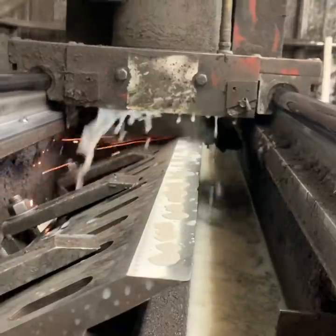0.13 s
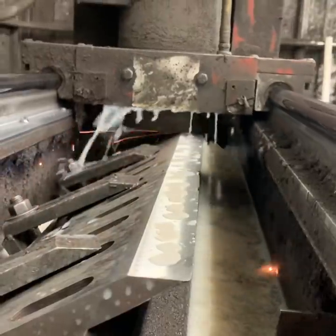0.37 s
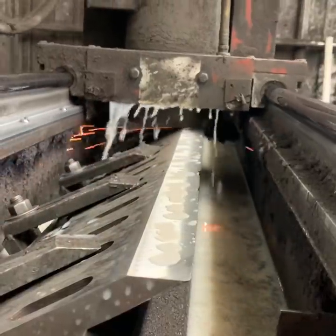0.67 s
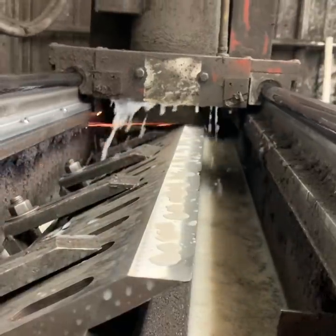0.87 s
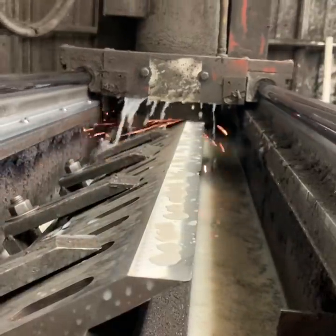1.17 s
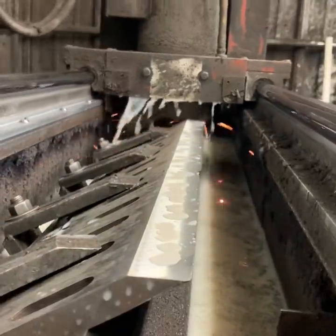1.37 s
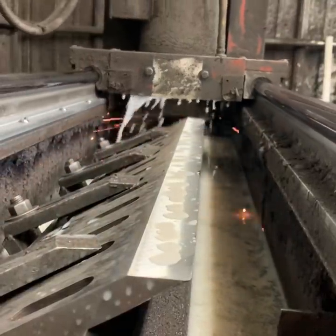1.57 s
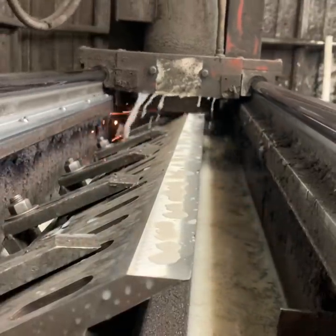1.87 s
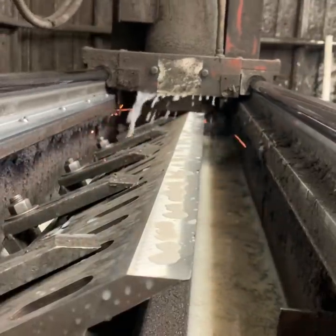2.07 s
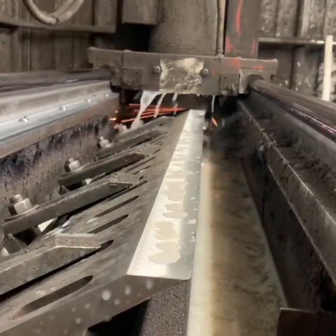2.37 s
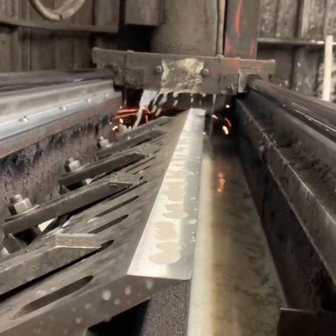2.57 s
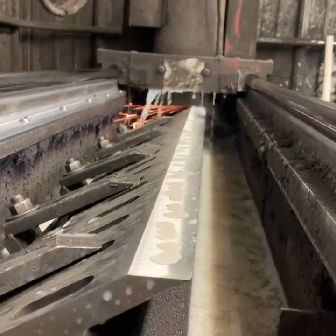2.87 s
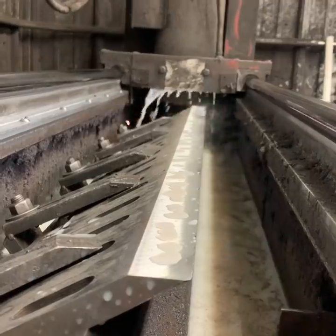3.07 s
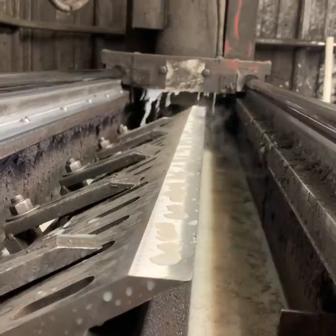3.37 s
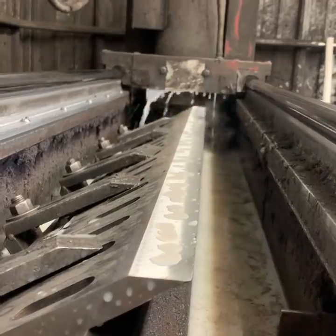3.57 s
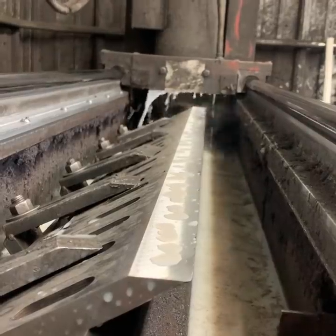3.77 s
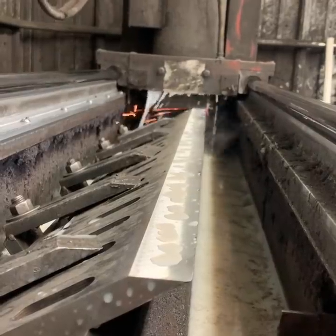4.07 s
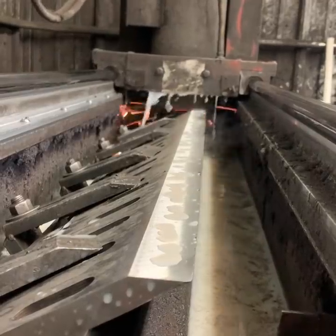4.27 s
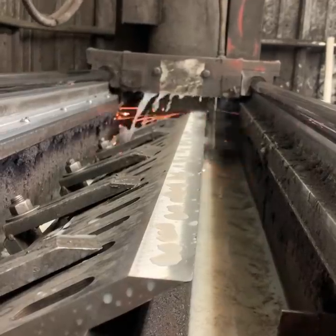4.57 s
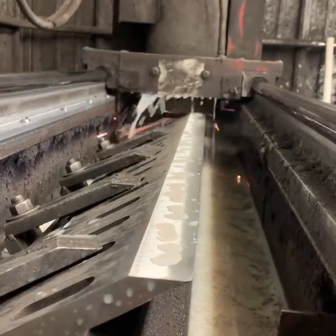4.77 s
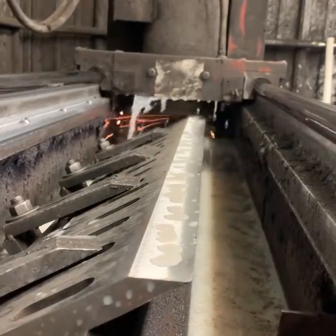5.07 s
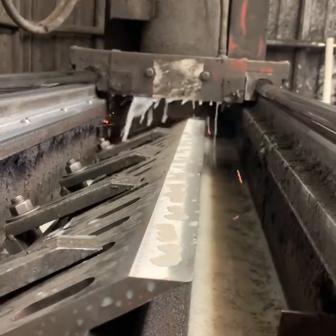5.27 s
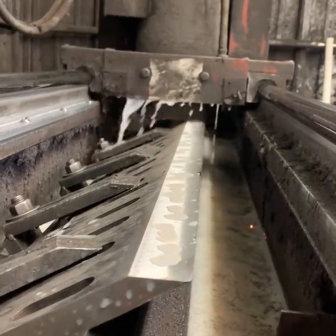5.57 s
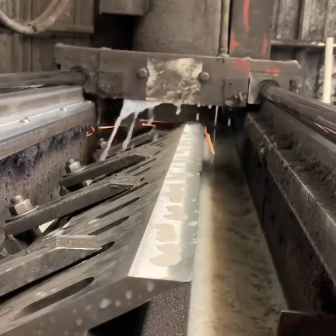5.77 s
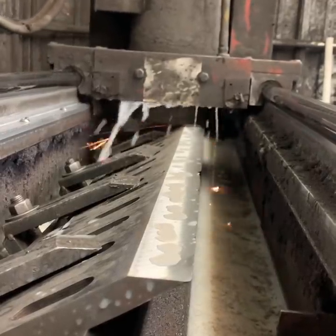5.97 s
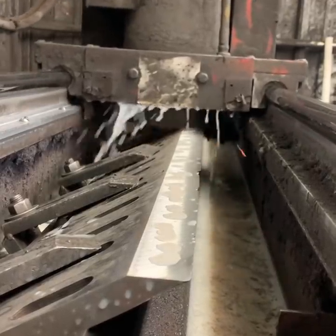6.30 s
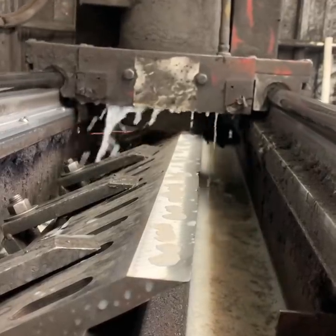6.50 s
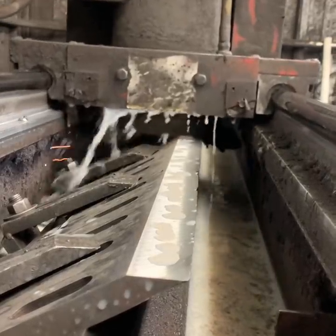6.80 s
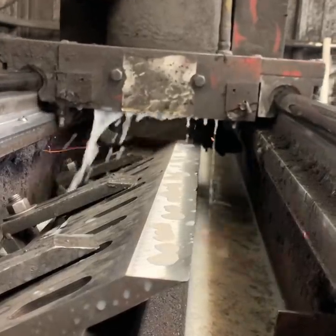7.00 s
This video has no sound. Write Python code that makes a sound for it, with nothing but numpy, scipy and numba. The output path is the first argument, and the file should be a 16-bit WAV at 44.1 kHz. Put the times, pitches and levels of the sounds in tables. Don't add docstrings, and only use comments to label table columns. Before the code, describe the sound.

A heavy grinding carriage travels over steel with low motor buzz, rumbling bed, gritty hiss and fluttering mid-pitched singing. Early knocks and a biting screech interrupt it. The cutting stops briefly, a loud metal clank rings through the tin shed, then contact returns with a thud and deeper, stronger grinding, tiny ticks and occasional scrapes. Coolant spray and fans run throughout, captured closely in stereo.

```python
import sys
import numpy as np
from scipy import signal
from scipy.fft import rfft, irfft, next_fast_len
from scipy.io import wavfile
from scipy.ndimage import uniform_filter1d, map_coordinates
from numba import njit

SR = 44100
rng = np.random.default_rng(int(sys.argv[2]) if len(sys.argv) > 2 else 0)


def log_audio(samples):
    frames = np.atleast_2d(samples).T
    limited = np.clip(frames, -1, 1)
    pcm = np.round(limited * 32767).astype(np.int16)
    wavfile.write(sys.argv[1], SR, pcm)


def gain_from_db(level_db):
    decades = np.asarray(level_db, float) / 20
    return 10 ** decades


N = 314874
TIME = np.arange(N) / SR
HUM_HZ, TURN_SAMPLES = 120, 1514
LEAVES_S, TURNS_AT_S, MEETS_S = 2.955, 3.35, 3.895


def unit(x):
    return x / np.sqrt(np.mean(x ** 2))


def on_log(hz, points):
    points_hz, values = np.transpose(points)
    return np.interp(np.log(hz + 1), np.log(points_hz), values)


def colour(x, points):
    gain = gain_from_db(on_log(np.fft.rfftfreq(N, 1 / SR), points))
    return unit(irfft(rfft(x) * gain, N))


def curves(table):
    s, *columns = np.transpose(table)
    return [np.interp(TIME, s, c) for c in columns]


def walk(rate_hz):
    k = int(SR / rate_hz)
    held = np.repeat(rng.standard_normal(N // k + 1), k)
    return 1.5 * uniform_filter1d(uniform_filter1d(held, k), k)[:N]


def decay(t, t60_s):
    return np.exp(-np.log(1000) * t / t60_s)


def span(start_s, length_s):
    return slice(int(start_s * SR), int((start_s + length_s) * SR))


@njit
def svf(x, hz, width):
    y, b, l = np.empty(len(x)), 0., 0.
    for i in range(len(x)):
        g, k = np.tan(np.pi * hz[i] / SR), width / hz[i]
        v = (b + g * (x[i] - l)) / (1 + g * (g + k))
        b, l, y[i] = 2 * v - b, l + 2 * g * v, k * v
    return y


def band(x, hz, width_hz):
    return svf(x, hz + 0 * x, float(width_hz))


def wheel_face(keep):
    turns = rng.standard_normal((N // TURN_SAMPLES + 1, TURN_SAMPLES))
    return unit(signal.lfilter([1], [1, -keep], turns, axis=0).ravel()[:N])


def wheel_grains():
    turn = np.cos(2 * np.pi * np.arange(N) / TURN_SAMPLES + 1.3 * walk(2.1))
    pull = np.cos(2 * np.pi * HUM_HZ * TIME)
    grains = unit(rng.standard_normal(N) * gain_from_db(1.55 * rng.exponential(size=N)))
    return grains * gain_from_db(1.2 * turn + 0.41 * pull + 0.55 * walk(13))


# time in seconds, pitch in Hz.
GUARD_PITCH = [(0, 6800), (.2, 6550), (.5, 6380), (1.5, 6270), (2.4, 6420), (2.9, 6200), (3.9, 6470),
               (4.4, 6500), (5, 6200), (5.4, 6510), (5.9, 6360), (6.4, 6300), (6.7, 6830), (7.14, 6460)]


def guard_ring(grains):
    hz = curves(GUARD_PITCH)[0] + 45 * walk(35)
    flicker_db = 1.8 * walk(16)
    return gain_from_db(-12.0 + flicker_db) * unit(band(band(grains, hz, 460), hz, 460))


# pitch in Hz, width in Hz, level in dB.
CLAMP_MODES = [(3200, 330, -19), (5000, 92, -36), (7650, 180, -24.5), (10340, 150, -27)]


def clamp_rings(grains):
    out = 0
    for hz, width_hz, db in CLAMP_MODES:
        level = gain_from_db(db + 2.5 * walk(1.65))
        out = out + level * unit(band(grains, hz * (1 + 0.012 * walk(1.7)), width_hz))
    return out


# frequency in Hz, density in dB per Hz.
BED_COLOUR = [(30, -46), (60, -37), (90, -2), (170, -1), (270, -1.5), (340, 4.5), (450, -4), (700, -9),
              (1300, -23), (4000, -74)]
# pitch in Hz, width in Hz, level in dB.
BED_RESONANCES = [(253.5, 22, -4.5), (338.5, 16, -13), (463, 24, -21), (176, 10, -41)]


def bed_rumble():
    bed = gain_from_db(1.74 * walk(16)) * colour(wheel_face(0.39), BED_COLOUR)
    return bed + sum(gain_from_db(db) * unit(band(bed, hz, width_hz)) for hz, width_hz, db in BED_RESONANCES)


# time in seconds, grit level in dB, depth of cut in dB.
CUTTING_PASSES = [
    [(0, -41.5, -1), (.13, -42, -6), (.35, -46.5, -6.5), (.85, -46, 1), (1.65, -46, -1.5), (1.95, -49, -4),
     (2.2, -46.5, -3), (2.8, -49.5, 0), (2.93, -51, 2.5)],
    [(3.92, -45, 2), (4.15, -45, 1.5), (4.75, -44, 3), (5.35, -43, 8), (5.7, -43, 4.5), (6.4, -43.5, 5),
     (6.7, -42.5, 6), (6.9, -41, 3), (7.14, -42, 5.5)],
]
# frequency in Hz, density in dB per Hz.
GRIT_COLOUR = [(500, -15), (1300, -9.5), (1800, -8.5), (2400, -11), (3300, -7), (5000, -5.5), (6800, -6.5),
               (7400, -11), (9000, -10), (11000, -14), (15500, -17)]
# frequency in Hz, density in dB per Hz.
BODY_COLOUR = [(300, -15), (500, 3), (730, -0.5), (1000, -9.5), (1400, -5), (1900, -25), (4000, -41)]


def grinding():
    grit_db, depth_db = curves(np.vstack(CUTTING_PASSES))
    bed_db = -29.5 + depth_db + 1.35 * walk(30)
    body_db = -40 + 0.86 * depth_db + 2.3 * walk(25)
    touching = np.clip(np.maximum(LEAVES_S - TIME, TIME - MEETS_S) / 0.052, 0, 1)
    grains = wheel_grains()
    grit = colour(grains, GRIT_COLOUR) + guard_ring(grains) + clamp_rings(grains)
    body = colour(wheel_face(0.44), BODY_COLOUR)
    return touching * (gain_from_db(grit_db + 11) * grit + gain_from_db(bed_db) * bed_rumble() + gain_from_db(body_db) * body)


# start in seconds, length in seconds, pitch in Hz, level in dB.
BLADE_STRETCHES = [(.048, 0.026, 1050, -29), (.048, 0.032, 960, -30), (.118, 0.26, 1110, -58),
                   (.616, 0.067, 1064, -37.5), (.83, 0.13, 1126, -37), (.957, 0.14, 928, -38),
                   (0, 0.93, 720, -44.5), (1.234, 0.92, 1055, -44), (1.8, 0.34, 728, -41),
                   (.15, 0.48, 815, -44), (2.5, 0.15, 1187, -40.5), (2.55, 0.34, 649, -42.5),
                   (2.764, 0.2, 1060, -42), (3.904, 0.086, 1000, -33), (4.06, 0.33, 938, -38.5),
                   (4.549, 0.294, 1100, -37.5), (4.8, 0.32, 1063, -41), (5.575, 0.7, 1069, -40),
                   (6.42, 0.5, 1100, -40), (4.1, 0.35, 1095, -41), (0, 2, 844, -51),
                   (6.65, 0.76, 1207, -40.5)]
# start in seconds, length in seconds, pitch in Hz,
# level in dB.
THIN_EDGE = [(.115, 0.014, 1660, -33), (0.41, 0.29, 4890, -42), (0.93, 0.014, 1430, -37),
             (0.902, 0.048, 5604, -35), (.86, .07, 6643, -40), (0.76, 0.12, 4800, -38),
             (.838, 0.018, 5000, -27), (1.1, 0.011, 4300, -34), (0.76, 0.019, 3100, -39),
             (.865, .036, 2850, -31.5), (.925, 0.05, 3100, -35), (7, 0.081, 5100, -33),
             (.78, 0.055, 3150, -48), (1.11, 0.96, 3300, -52), (3.1, 0.098, 3120, -50),
             (2.3, 0.028, 1530, -39), (3.9, 0.044, 2300, -37), (5.67, .5, 3070, -45), (7, 0.03, 3500, -38),
             (6.79, 0.24, 4200, -50)]


def rings():
    out, face, waver = np.zeros(N), wheel_face(0.84), gain_from_db(0.84 * walk(40))
    for table, q, smear in ((BLADE_STRETCHES, 30, 1.1), (THIN_EDGE, 87, 2.5)):
        for start_s, length_s, hz, db in table:
            part = span(start_s, length_s)
            swell = np.hanning(len(face[part])) ** 0.067 * waver[part]
            width_hz = hz / q + smear / length_s
            out[part] += gain_from_db(db) * swell * unit(band(band(face[part], hz, width_hz), hz, width_hz))
    return out


# start in seconds, length in seconds, pitch in Hz, level in dB.
PURE_TONES = [(.1, .35, 1104, -46), (.2, .3, 1077, -48), (.824, .03, 2810, -30), (.858, .075, 6643, -37),
              (.863, .042, 2810, -31), (.878, .03, 5604, -36), (.896, .05, 5604, -28),
              (.9, .3, 1104, -46), (.925, .065, 2810, -35), (1.2, .7, 1050, -47), (1.25, .65, 1077, -45),
              (1.3, .25, 790, -43), (1.85, .3, 727, -43), (2, .6, 963.6, -47), (2.38, .12, 910, -42),
              (2.49, .17, 910, -41), (2.5, .25, 824, -45), (2.58, .22, 646, -40), (2.7, .12, 2700, -45),
              (2.72, .13, 2150, -45), (2.78, .2, 1039, -39), (2.8, .03, 3080, -41),
              (2.87, .075, 3100, -37), (2.89, .05, 1600, -38), (3.203, .024, 750, -28),
              (3.208, .034, 526, -26), (3.232, .02, 780, -31), (3.395, .03, 800, -34),
              (3.92, .08, 3100, -43), (4.1, .3, 940, -42), (4.4, .55, 963.6, -41), (4.56, .26, 1104, -38),
              (4.8, .5, 1104, -43), (4.571, .3, 1050, -43), (4.6, .55, 1077, -41),
              (4.97, .25, 963.6, -43), (5.2, .3, 818, -43), (5.6, .22, 1050, -44), (5.74, .25, 3063, -39),
              (5.95, .2, 3063, -45), (5.83, .3, 1104, -43), (5.93, .38, 1077, -43),
              (6.42, .64, 1104, -39), (6.55, .59, 1373, -46), (6.65, .49, 1227, -45),
              (6.66, .16, 1104, -43), (6.86, .17, 963.6, -38)]


def songs():
    out, waver, chatter, drift = np.zeros(N), walk(30), walk(150), walk(40)
    for start_s, length_s, hz, db in PURE_TONES:
        part = span(start_s, length_s)
        waver_db = 2.5 * waver[part] + min(hz / 800, 2.5) * chatter[part]
        swell = np.hanning(len(out[part])) ** 0.35 * gain_from_db(waver_db)
        tone = np.sin(2 * np.pi * hz * TIME[part] + 0.015 * np.sqrt(hz) * drift[part])
        out[part] += gain_from_db(db + 2.6) * swell * tone
    return out


# start in seconds, length in seconds, level in dB, centre in Hz.
BITES = [
    (0.822, 0.023, -24, 3230),
    (0.865, 0.044, -25.5, 3300),
    (0.81, 0.087, -40, 1490),
    (0.906, 0.075, -35, 3600),
    (2.86, 0.028, -35, 2590),
    (5.309, 0.045, -30.5, 3700),
    (6.647, 0.053, -26, 4000),
]


def scrapes():
    out = 0
    slips = unit(rng.standard_normal(N) * gain_from_db(2.0 * rng.exponential(size=N) + 1.2 * walk(110)))
    for start_s, length_s, db, hz in BITES:
        tail = np.exp(-np.maximum(TIME - start_s - length_s, 0) / 0.0088)
        shape = np.clip((TIME - start_s) / 0.002, 0, 1) * tail
        lowpass = signal.butter(1, 1.8 * hz, fs=SR, output="sos")
        out = out + gain_from_db(db) * shape * unit(signal.sosfilt(lowpass, band(slips, hz, 1.1 * hz)))
    return out


# pitch in Hz, level in dB, t60 in seconds.
STOP_MODES = [(530, -9, 0.1), (726, -16, 0.15), (770, -21, 0.093), (2000, -8, 0.13), (2210, -1, 0.08),
              (2670, -7, 0.13), (3400, 1, 0.047), (3990, 2, 0.044), (4320, -33, 0.14), (4850, -16.5, 0.17),
              (4963, -8, 0.31), (5270, -17, 0.2), (5780, -3, 0.24), (6540, -15, .12), (7200, -25, 0.092),
              (6950, -22, .05), (7770, -5, 0.1), (8190, -10, .12), (11300, -7, 0.13)]
# frequency in Hz, density in dB per Hz.
CRACK_COLOUR = [(450, 5), (700, -3), (1100, -11), (1700, -13.5), (2400, -20.5), (3300, -14), (6500, -14.5),
                (10000, -13.5), (15500, -16)]
# time in seconds, peak in dB, t60 in seconds, centre of colour in Hz, ring in dB.
BLOWS = [(.05, -31, 0.11, 1270, -34), (0.089, -21, 0.08, 2000, -28), (0.12, -20, 0.052, 1610, -34),
         (1.21, -22, 0.2, 3010, -26), (2.07, -22, 0.031, 11000, -38), (2.915, -16, 0.065, 2400, -33.5),
         (3.198, -9, 0.052, 3600, -5), (3.204, -6, 0.098, 2550, -6), (3.213, -17.5, 0.32, 4830, -5),
         (3.225, -34, 0.18, 5600, -14), (3.394, -20.5, 0.086, 1085, -16), (3.409, -19, 0.094, 795, -27),
         (3.658, -31, .05, 1900, -33), (3.559, -28, 0.084, 2840, -35), (3.685, -30, 0.066, 5000, -32),
         (3.88, -24, 0.052, 3400, -32), (3.909, -22.5, 0.74, 1560, -18), (4.777, -34, 0.022, 6250, -42),
         (5.429, -25, 0.026, 10500, -40), (6.036, -21, 0.03, 10600, -42), (6.41, -22, 0.034, 10400, -48),
         (6.58, -24, .03, 10500, -53), (3.937, -36, .03, 10500, -40), (3.083, -34, .03, 10500, -40),
         (3.146, -35, .03, 10500, -46), (3.515, -34, .03, 10400, -39), (6.76, -17, 0.051, 6500, -42)]


def knocks():
    out = np.zeros(N)
    crack = colour(rng.standard_normal(N), [(300, -36)] + CRACK_COLOUR)
    rattle = 0.85 * walk(200)
    phases = 2 * np.pi * rng.random((len(BLOWS), len(STOP_MODES)))
    for (s, db, t60_s, hz, ring_db), phase in zip(BLOWS, phases):
        at = int(s * SR)
        t = TIME[:min(N - at, SR // 2)]
        part = slice(at, at + len(t))
        wide = band(crack[part], hz, 1.9 * hz)
        centre = unit(band(wide, hz, 0.9 * hz))
        noise = unit(wide) * decay(t, 0.55 * t60_s) + 0.76 * centre * decay(t, t60_s)
        ring = sum(gain_from_db(mode_db) * np.sin(2 * np.pi * mode_hz * t + p) * decay(t, mode_t60_s)
                   for (mode_hz, mode_db, mode_t60_s), p in zip(STOP_MODES, phase))
        blow = gain_from_db(-8.5) * noise + gain_from_db(ring_db - 8) * ring * (1 + rattle[part])
        out[part] += gain_from_db(db) * np.minimum(t / 0.00081, 1) * blow
    return out


# pitch in Hz, level in dB, t60 in seconds.
STOP_LINGER = [(4340, -36, .25), (4520, -31, .3), (4680, -36, .3), (4860, -30, .3), (6024, -31, .26),
               (6508, -30, .13)]


def stop_ring():
    t = np.maximum(TIME - 3.205, 0)
    ring = sum(gain_from_db(db + 1.7 * walk(49)) * np.sin(2 * np.pi * hz * t) * decay(t, t60_s)
               for hz, db, t60_s in STOP_LINGER)
    return np.minimum(t / 0.014, 1) * ring


# time in seconds, levels in dB of hum multiples 1, 2, 3, 5.
HUM_LEVELS = [
    [(0.0, -30.5, -46, -28, -29), (0.05, -21.5, -29.5, -32.5, -33), (0.684, -24.5, -32.5, -34, -37),
     (0.968, -28.5, -27, -32, -38), (1.052, -21.5, -35, -32, -36), (1.236, -21.5, -23.5, -33, -36.5),
     (1.5, -25.5, -25.5, -27, -39)],
    [(1.55, -21, -24.5, -24, -39), (1.768, -24, -26.5, -48, -36), (1.868, -23.5, -24, -32.5, -35),
     (2.574, -19, -30.5, -37, -37), (2.652, -20, -40, -34, -52), (2.902, -17, -26.5, -28.5, -34),
     (2.95, -22.5, -24, -46, -32)],
    [(2.98, -23, -27, -40, -41), (3.078, -16.5, -24.5, -35.5, -44), (3.228, -20, -32, -41.5, -41.5),
     (3.454, -16.5, -23, -25.5, -41.5), (3.878, -16, -23.5, -31, -51), (3.9, -16, -19, -32.5, -32),
     (4.1, -16, -27.5, -30, -43)],
    [(4.15, -17, -31, -41, -46), (4.222, -19, -24, -26, -33), (4.314, -16, -28, -42, -38),
     (4.334, -19.5, -22.5, -31, -35.5), (4.972, -21.5, -18.5, -31, -31.5), (5.16, -18.5, -21.5, -32, -34),
     (5.264, -19, -28, -40, -38), (5.6, -18, -27.5, -27, -33.5)],
    [(5.65, -18, -26.5, -29, -38), (5.898, -19.5, -27.5, -32.5, -35), (6.504, -24, -27.5, -25, -34),
     (6.646, -22, -43, -26.5, -30), (7.056, -21, -33, -35, -31.5), (7.102, -17, -27, -23.5, -36),
     (7.14, -20, -36, -34, -18)],
]
# time in seconds, length in seconds, hum change in dB.
JAMS = [(0.007, 0.036, -1), (0.435, 0.018, -1), (0.945, 0.043, 1), (1.482, 0.027, -3), (1.743, 0.044, -1),
        (1.267, 0.0084, 0.5), (2.19, 0.015, -1), (4.137, 0.035, -2.5), (4.644, 0.026, 0),
        (4.972, 0.039, -2.5), (5.85, 0.036, 0), (6.946, 0.016, -1), (6.545, 0.029, -2)]
WOBBLE_SHARE = {1: 1, 2: 1.4, 3: 2.6, 5: .6}


def hum():
    out, place_s = 0, abs(TIME - TURNS_AT_S)
    load_db = sum(db * np.exp(-((TIME - s) / length_s) ** 2) for s, length_s, db in JAMS)
    wobble_db = np.interp(place_s, [0.45, 0.55], [0.3, 1.3])
    heard_s = TIME + place_s * 0.2 / 343
    for k, db in zip((1, 2, 3, 5), curves(np.vstack(HUM_LEVELS))):
        level = gain_from_db(db + load_db + 1.52 + wobble_db * WOBBLE_SHARE[k] * walk(24))
        jitter = 0.42 * np.sqrt(k) * walk(2.46) + 0.18 * k * walk(18)
        out = out + level * np.sin(2 * np.pi * k * HUM_HZ * heard_s + jitter + k)
    return np.sqrt(2) * out


# pitch in Hz, level in dB.
STEADY_LINES = [(58.5, -49.5), (88, -56), (480, -39.5), (525.9, -38), (720, -48.5), (818, -63), (963.5, -59),
                (1105, -53.5), (1374, -54)]


def steady_lines():
    return np.sqrt(2) * sum(gain_from_db(db + walk(4.26)) * np.sin(2 * np.pi * hz * TIME + 0.64 * walk(2.82))
                            for hz, db in STEADY_LINES)


# frequency in Hz, density in dB per Hz.
SHOP_COLOUR = [(40, -13), (70, -39), (100, 5), (170, 3), (300, 4.5), (450, 2), (700, -12), (1100, -10.5),
               (1700, -18.5), (2400, -23.5), (3300, -23.5), (6500, -28), (10000, -34.5), (15500, -36)]


def shop():
    spray = colour(rng.standard_normal(N) * gain_from_db(0.95 * rng.exponential(size=N)), SHOP_COLOUR)
    gusts = sum(gain_from_db(-6.0 + 3.9 * walk(25)) * band(spray, hz, 0.5 * hz)
                for hz in (1200, 2070, 3200, 5000, 7000, 10200))
    return gain_from_db(-31) * (spray + gusts)


# frequency in Hz, level in dB.
SHED_ECHO = [(60, -27), (130, -32), (400, -9), (650, -5), (900, -2), (1400, -5), (2500, 0), (3400, -4),
             (4700, -10), (6000, -8.5), (15000, -6)]


def shed(sound, wet, size):
    t = TIME[:SR // 2]
    tails = rfft(rng.standard_normal((2, SR // 2)) * decay(t, 0.21), size)
    evened = irfft(tails / abs(tails) ** 0.62, size)[:, :SR // 2]
    response = evened * decay(t, 0.6) * np.minimum(t / 0.015, 1) ** 2
    response = response / np.sqrt(np.sum(response ** 2, axis=1, keepdims=True))
    echo = irfft(sound * wet * rfft(response, size), size)
    paths = np.arange(N) + 14 * np.array([walk(1.2), walk(1.2)])
    return np.array([map_coordinates(e, [p], order=3, mode="nearest") for e, p in zip(echo, paths)])


# frequency in Hz, phase in radians.
PORT_LEAD = [(0, 0), (130, .045), (300, .15), (1300, .3), (2600, -.6), (4700, -3.14), (6850, -6.28),
             (8950, -9.42), (11000, -12.57), (13100, -15.7), (15200, -18.85), (22050, -29)]
# frequency in Hz, level in dB.
PORT_BALANCE = [(60, -1.3), (130, -0.6), (300, -2), (600, 0.5), (2000, -3.5), (4000, 0.15)]
# frequency in Hz, level in dB.
MIC_RESPONSE = [(20, -33), (45, 1), (80, 0), (15500, 2), (16250, -10), (16500, -64)]


def scene():
    size = next_fast_len(N + SR)
    hz = np.fft.rfftfreq(size, 1 / SR)
    sound = rfft(grinding() + rings() + scrapes() + knocks() + shop(), size)
    wet = gain_from_db(on_log(hz, SHED_ECHO))
    sound = sound * gain_from_db(on_log(hz, MIC_RESPONSE)) / np.sqrt(1 + wet ** 2)
    near = rfft(songs() + hum() + steady_lines(), size)
    lead = np.exp(0.5j * np.interp(hz, *np.transpose(PORT_LEAD)))
    pan = gain_from_db(on_log(hz, PORT_BALANCE) / 2)
    direct = irfft((sound + near) * np.array([pan / lead, lead / pan]), size)[:, :N]
    return direct + stop_ring() + shed(sound, wet, size)


BAND_EDGES = np.r_[196:769:16]


def thin_stereo(x):
    frames = signal.stft(np.array([x[0] + x[1], x[0] - x[1]]) / 2, nperseg=2048)[2]
    treble = np.mean(abs(frames[:, BAND_EDGES[0]:]) ** 2, axis=(0, 1))
    sudden = treble > gain_from_db(16) * np.roll(treble, 1)
    for lo, hi in zip(BAND_EDGES, BAND_EDGES[1:]):
        rms = np.sqrt(np.mean(abs(frames[:, lo:hi]) ** 2, axis=1))
        floor_db = -3.0 - 6.0 * BAND_EDGES[0] / lo
        keep = sudden | (rms > gain_from_db(floor_db) * rms[::-1])
        frames[:, lo:hi] *= keep[:, None]
    frames[:, 735:] *= sudden
    after = np.convolve(sudden, np.r_[0, np.ones(6)])[:len(sudden)] > 0
    frames[:, 680:, after] = 0
    mid, side = signal.istft(frames, nperseg=2048)[1][:, :N]
    return np.array([mid + side, mid - side])


def low_pass(x):
    return signal.sosfilt(signal.butter(12, 16290, fs=SR, output="sos"), x)


def record(dry):
    rounded = np.tanh(0.61 * dry) / 0.59
    mix = thin_stereo(rounded)
    return low_pass(mix)


dry = scene()
out = record(dry)
log_audio(out)
```